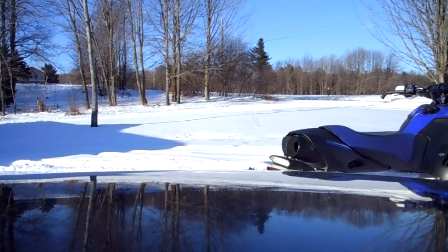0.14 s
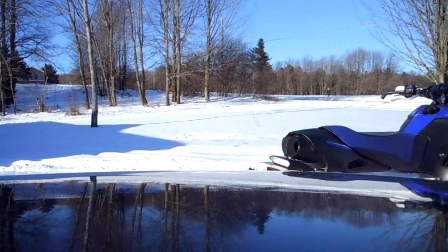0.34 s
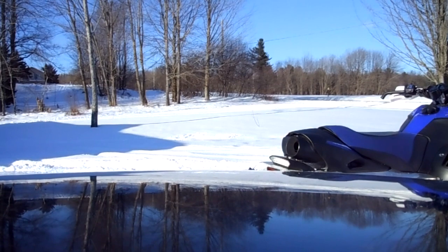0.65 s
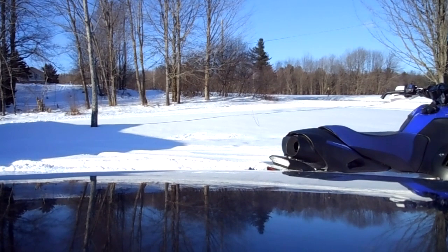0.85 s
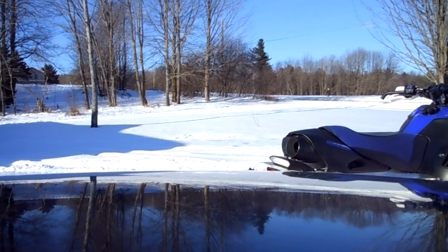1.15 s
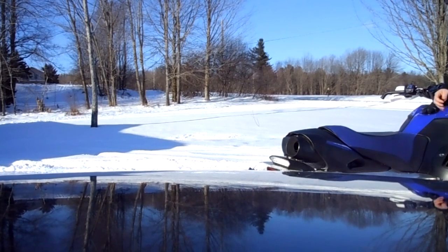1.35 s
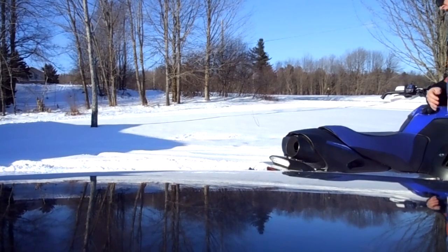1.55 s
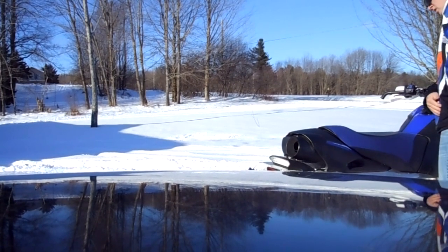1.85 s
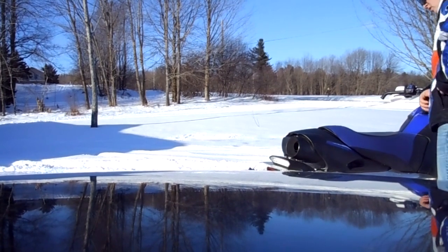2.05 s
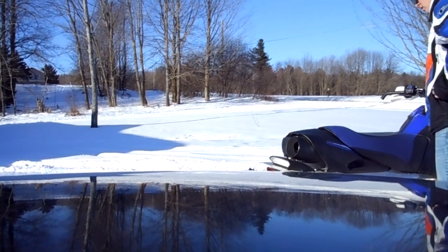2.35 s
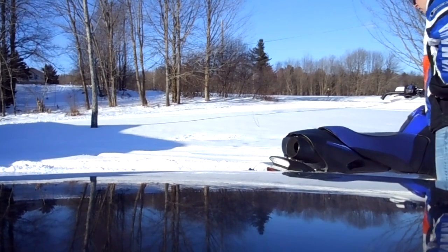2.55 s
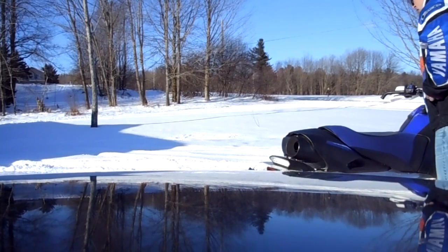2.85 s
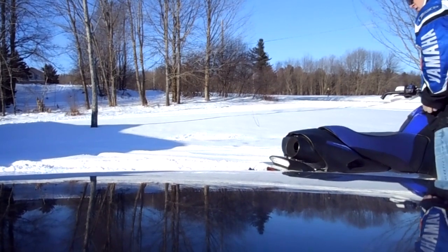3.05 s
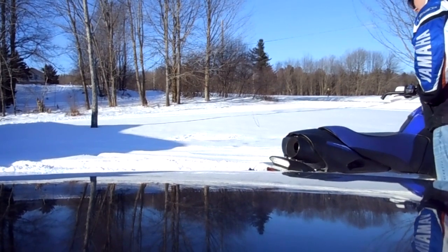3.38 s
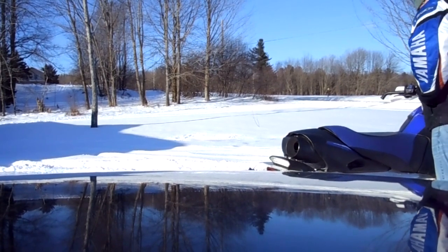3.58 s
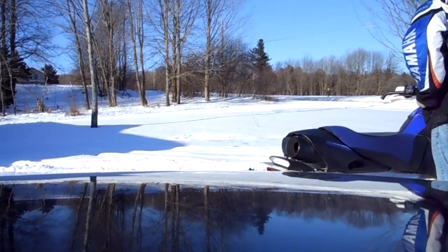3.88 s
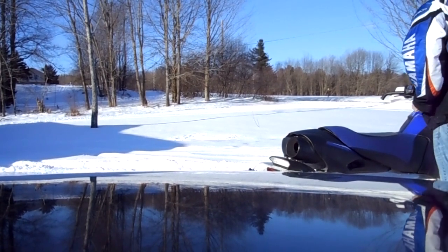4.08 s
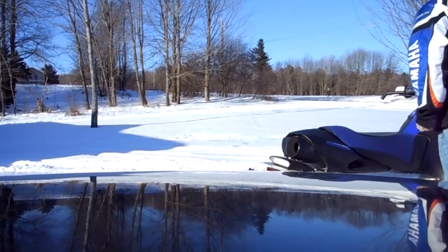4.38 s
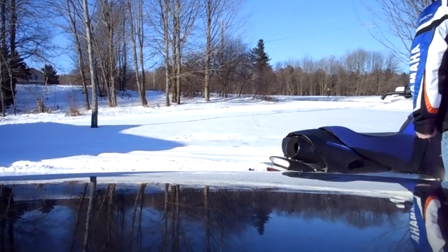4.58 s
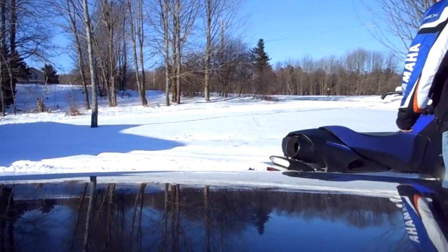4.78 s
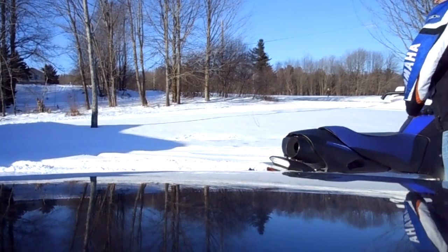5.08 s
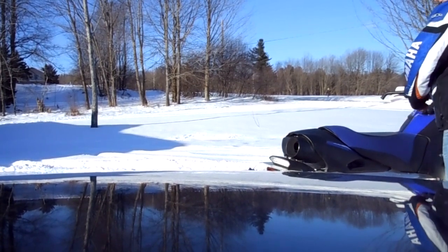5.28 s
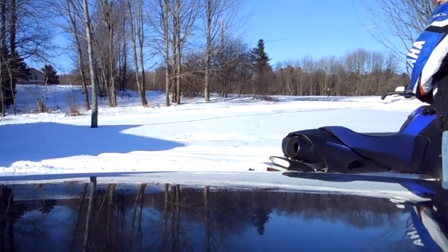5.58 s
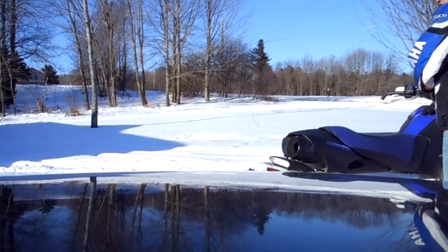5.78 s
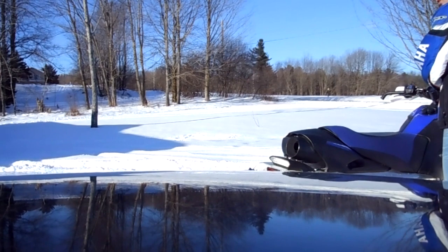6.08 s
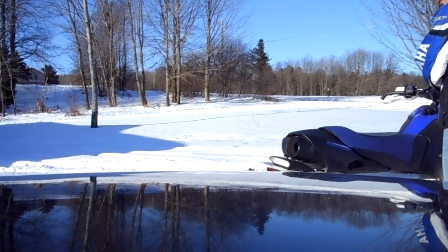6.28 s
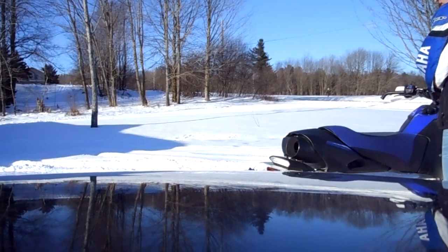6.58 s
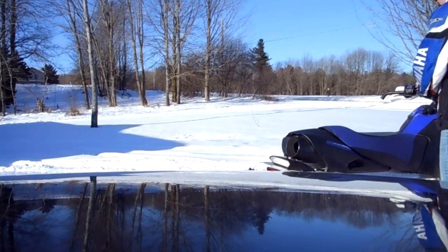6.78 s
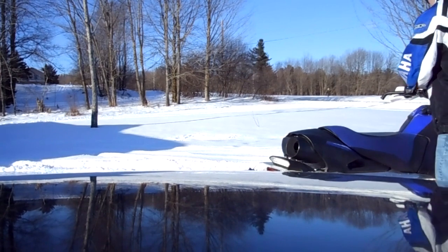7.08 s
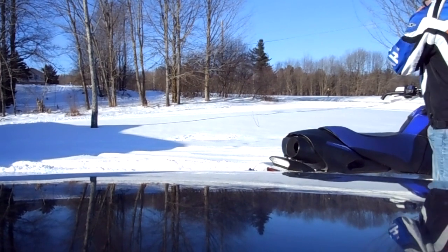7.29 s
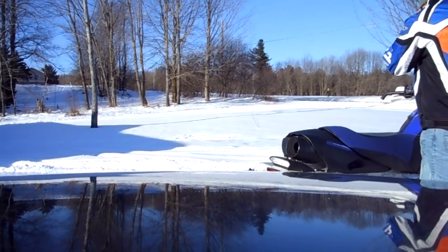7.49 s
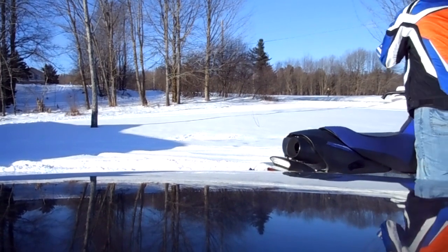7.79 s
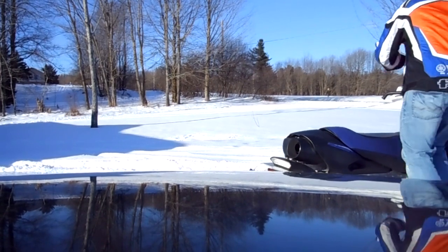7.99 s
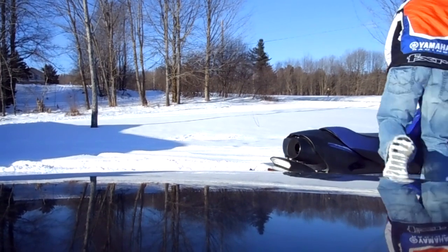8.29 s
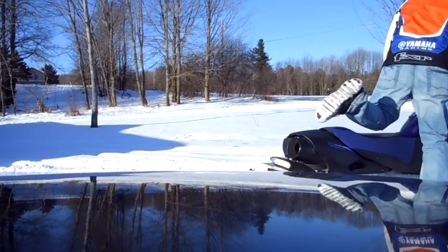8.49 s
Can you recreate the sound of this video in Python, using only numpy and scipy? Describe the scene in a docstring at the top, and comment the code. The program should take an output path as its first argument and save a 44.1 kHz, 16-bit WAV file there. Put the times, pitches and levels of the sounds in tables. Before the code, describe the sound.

Close outdoor idle of a snowmobile with a loud exhaust: fast low throbbing, uneven hunting, sharp hissy spits, mechanical ticking, and a brief rev near the end.

```python
"""A three-cylinder four-stroke snowmobile stands idling in an open snowy yard, a few metres from two close ports.
From the start each firing booms and barks in the silencer, spits a short jet of gas and rasps as the pipe swings back.
Valve gear ticks between the firings, over a whirr of chain and gears and the ring of the engine casing.
The idle hunts in speed and effort and these layers follow; loose parts of the hood buzz twice, once before
the middle and once well after it. Near the end a small blip of throttle: the intake growls, the bark hardens."""
import sys
import numpy as np
from scipy import signal
from scipy.fft import rfft, irfft, next_fast_len
from scipy.io import wavfile

SR = 44100
rng = np.random.default_rng(int(sys.argv[2]) if len(sys.argv) > 2 else 0)


def persist_wave(psi):
    """Save psi, clipped to +-1, as 16-bit WAV."""
    counts = np.round(np.clip(psi, -1, 1) * 32767).astype(np.int16)
    wavfile.write(sys.argv[1], SR, np.atleast_2d(counts).T)


N = 381024

# spare samples before and after the scene, so that noise and pulses have room at its ends
LEAD = 4410
TIME = np.arange(-LEAD, next_fast_len(N + 2 * LEAD) - LEAD) / SR
FREQS = np.arange(len(TIME) // 2 + 1) * SR / len(TIME)

# how hard the engine works; exhaust and machinery follow it: (time [s], effort about the usual idle [dB])
EFFORT = [(0.0, 1.5), (0.52, 1.5), (0.72, -0.9), (1.06, 3), (1.16, 0.5), (1.56, -1.9), (1.89, -0.8),
          (2.19, 2.5), (2.26, 0.44), (3.96, 1.53), (4.26, -2), (4.56, 1.14), (5.81, 1.5), (6.03, -1.1),
          (6.69, 2.3), (6.75, -0.2), (7.44, 1.6), (7.54, -1), (8.07, 1.9), (8.18, 4.5), (8.3, 0), (8.64, 4)]


def undb(db):
    """Decibels to gain."""
    return 10 ** (np.asarray(db) / 20)


def across(points, at=FREQS, axis=1):
    """Join the rows (frequency [Hz], value, ..) on a log-frequency axis."""
    columns = np.transpose(points)
    return np.interp(np.log(np.maximum(at, 1)), np.log(columns[0]), columns[axis])


def swell(times, middle_s, half_s):
    """A smooth rise and fall, 1 at its middle and 1/e at half_s to either side."""
    return np.exp(-((times - middle_s) / half_s) ** 2)


def hiss(gain):
    """Turbulence: white noise shaped by the given gain per frequency, rms 1."""
    noise = irfft(rfft(rng.standard_normal(len(TIME))) * gain, len(TIME))
    return noise / np.std(noise)


def puffs(times, db, width_s, spectrum, rate=40.1):
    """A pointed burst of turbulence at each time; db is its rms level over one period of the rate [Hz]."""
    place = np.clip((times - TIME[0]) * SR, 0, len(TIME) - 1).astype(int)
    offset_s = np.arange(-LEAD, LEAD + 1) / SR
    bell = np.exp(-.5 * np.abs(offset_s / width_s) ** 1.205)
    bell /= np.sqrt(np.sum(bell ** 2) * rate / SR)
    strikes = np.bincount(place, undb(db), len(TIME))
    return signal.fftconvolve(strikes, bell, "same") * hiss(undb(across(spectrum)))


def crank(start_phase=.915, jitter=0.0053):
    """Firing rate and phase [cycles], firing times and numbers; no two strokes take quite as long."""
    # engine speed, a hunting idle and then the blip: (time [s], firings per second [Hz])
    speed = [(0.0, 35.82), (0.415, 39.3), (0.625, 36.07), (0.815, 35.81), (1.055, 38.07), (1.28, 36.64),
             (1.515, 37.38), (1.875, 35.96), (1.945, 37.2), (2.63, 37.88), (3.06, 37.03), (3.235, 38.64),
             (3.65, 36.49), (3.89, 39.53), (4.04, 38.11), (4.54, 37.72), (4.625, 38.6), (4.93, 35.22),
             (5.125, 39.15), (5.54, 37.12), (6.09, 39.03), (6.375, 36.39), (6.58, 38.66), (6.765, 35.82),
             (7.195, 40.34), (7.375, 37.42), (7.6, 37.07), (8.08, 38.8), (8.175, 44.51), (8.64, 41.09)]
    hz = np.interp(TIME, *np.transpose(speed))
    phase = np.cumsum(hz) / SR
    phase += start_phase - phase[LEAD]
    number = np.arange(np.ceil(phase[0]), phase[-1]).astype(int)
    phase += jitter * np.interp(phase, number, rng.standard_normal(len(number)))
    times = np.interp(number, phase, TIME)
    return hz, phase, times, number


def boom(phase, hz, lag=.086, smear=1.45):
    """One swing of suction and pressure per firing, six orders shaped by the silencer; rms 1."""
    # spectrum of the silencer's boom: (frequency [Hz], relative level [dB])
    silencer = [(33, -16), (38, -9.5), (45, -12), (74, 1), (88, -0.5), (114, 2), (132, -4), (146, -10),
                (160, -22), (186, -12), (210, -24.5), (240, -23.5)]
    orders = np.arange(1, 7)[:, None]
    gains = undb(across(silencer, orders * hz))
    # the silencer rings on the second and third order and turns the others out of step (radians)
    turn = smear * (orders - 2) * (orders - 3)
    swings = gains * np.sin(2 * np.pi * orders * (phase - lag) + turn)
    return np.sum(swings, axis=0) / np.sqrt(np.sum(gains ** 2, axis=0) / 2)


def bark(phase, hz, racing, lag=0.145, wander=0.007, smear=0.07, top_hz=510, flatten=0.1):
    """The steep edge of the blowdown pulse, a little early or late at each firing; sharper when racing.

    The pulse lasts a fixed crank angle, so the bark rises with speed; its orders sum to rms 1 at idle before the pipe.
    """
    # strength of each order at idle: (multiple of the firing rate, relative level [dB])
    blowdown = [(6, -14), (7, -5), (8, 0), (9, -5), (10, -11), (11, -12), (12, -13), (13, -19), (14, -27),
                (15, -24), (16, -28)]
    orders, db = np.transpose(blowdown)
    gains = undb(db) / np.sqrt(np.sum(undb(db) ** 2) / 2)
    # the spectrum flattens by this share per extra firing per second
    gains = gains[:, None] * undb(-flatten * db[:, None] * racing)
    number = np.arange(np.floor(phase[0]), phase[-1])
    angle = phase - lag + wander * np.interp(phase, number, rng.standard_normal(len(number)))
    # the pipe draws the pulse out a little and passes nothing far above its top frequency
    turns = smear * (orders - orders[np.argmax(db)]) ** 2
    edge = np.zeros(len(TIME))
    for order, gain, turn in zip(orders, gains, turns):
        passed = gain / (1 + (order * hz / top_hz) ** 20)
        edge -= passed * np.cos(2 * np.pi * np.round(order) * angle - turn)
    return edge


def exhaust(hz, phase, times, number, burn_db=0.88, spit_scatter_db=2.5, colour_db=2.16, flow_db=-24, surge_db=3):
    """Every firing burns a little differently; its pressure drives the silencer and the gas noise at the outlet."""
    # the three cylinders in firing order: (pressure [dB], ordinary spit [dB])
    cylinders = [(-0.12, 1.5), (1.45, 2.5), (0.17, 1)]
    # firings that spit hard: (time [s], nominal peak level [dB])
    hard_spits = [(0.2189, -12.5), (0.5851, -12), (0.6394, -15.5), (1.077, -7.5), (1.4002, -9),
                  (1.6432, -13.5), (1.6965, -11.5), (2.2922, -11.5), (3.0101, -14), (3.6486, -12),
                  (3.6755, -14), (3.7294, -11.5), (4.0657, -12.5), (4.119, -12), (5.0809, -13),
                  (5.3921, -11.5), (5.6331, -13.5), (5.8182, -11), (5.8706, -10), (6.1814, -13.5),
                  (6.6613, -10.5), (6.7974, -14), (6.9067, -10.5), (7.423, -12.5), (7.45, -9.5),
                  (7.5313, -12), (7.6924, -12)]
    # short spells in which ordinary firings spit less: (middle [s], half-length [s], level change [dB])
    lulls = [(1.51, 0.056, -5), (4.354, 0.066, -5), (8.425, 0.11, -8)]
    # spectrum of the swirling flow in the silencer: (frequency [Hz], relative level [dB])
    flow_spectrum = [(15, -27), (30, -32), (52, 14), (90, -25), (150, 4), (230, -8), (330, -3.5),
                     (480, -19), (900, -34.5)]
    # spectrum of the gas jet: (frequency [Hz], relative level [dB])
    spit_spectrum = [(300, -1), (800, -10.5), (2000, -21.5), (4500, -26), (6000, -24), (7500, -10),
                     (9700, -1), (11000, 1.5), (12500, 2), (14000, -8.5), (16000, -13.5)]
    # spectrum of the whistle at the outlet lip: (frequency [Hz], relative level [dB])
    whistle_spectrum = [(9000, -24), (11200, -12), (12300, 1.5), (12950, 7), (13700, 2), (14100, -20),
                        (15000, -16)]
    # spectrum of the rasp of the pipe: (frequency [Hz], relative level [dB])
    rasp_spectrum = [(200, 4), (800, 3), (1500, 1.5), (2800, 3.5), (4100, -3), (5200, -1), (7000, -1.5),
                     (10000, -0.5), (13500, 5), (16000, -4)]

    # base level at the usual idle (dB) plus the share of the effort that each layer follows (dB per dB)
    effort = np.interp(times, *np.transpose(EFFORT))
    boom_db = -15.5 + 0.67 * effort
    bark_db = -31.5 + 0.53 * effort
    rasp_db = -47.5 + 0.95 * effort
    spit_db = -40 + 0.47 * effort
    for middle_s, half_s, dip_db in lulls:
        spit_db = spit_db + dip_db * swell(times, middle_s, half_s)

    pressure_db, jet_db = np.array(cylinders)[(number - 1) % len(cylinders)].T
    burn, jet, colour = rng.standard_normal((len(times), 3)).T
    pressure_db = pressure_db + burn_db * burn
    jet_db = jet_db + spit_scatter_db * jet
    # the firing nearest each listed time spits hard; its spit sets its pressure too
    hard_s, peak_db = np.transpose(hard_spits)
    hard = np.abs(times[:, None] - hard_s).argmin(axis=0)
    crest_db = 20  # peak above the mean level over the firing
    jet_db[hard] = peak_db - crest_db - spit_db[hard]
    pressure_db[hard] = .22 * jet_db[hard]  # dB per dB above the usual spit
    jet_db = jet_db + spit_db

    # the gas swirls most just after each firing
    surge = flow_db + surge_db * np.cos(2 * np.pi * (phase - .1))
    swirl = undb(surge) * hiss(undb(across(flow_spectrum)))
    low = (boom(phase, hz) + swirl) * undb(np.interp(TIME, times, boom_db + pressure_db))

    # above the idle range the bark hardens with speed
    idle_top_hz, bark_db_per_hz = 40.4, 0.48
    racing = np.maximum(hz - idle_top_hz, 0)
    bark_gain = undb(np.interp(TIME, times, bark_db) + bark_db_per_hz * racing)
    edge = bark(phase, hz, racing) * bark_gain

    # the brief jet hisses and whistles in a balance that varies at random from firing to firing, and trails off;
    # the pipe swings back some milliseconds later
    jet_s = .0005  # width of the burst
    spit = puffs(times, jet_db - colour_db * colour - 2.5, jet_s, spit_spectrum)
    whistle = puffs(times, jet_db + colour_db * colour - 2.0, jet_s, whistle_spectrum)
    trail = puffs(times + 0.0025, jet_db - 15.5, jet_s, spit_spectrum)
    rasp = puffs(times + 0.0078, rasp_db + 1.55 * pressure_db, 0.0018, rasp_spectrum)
    return low + edge + spit + whistle + trail + rasp


def machinery(times, tick_db=-53, tick_scatter_db=2.5, whirr_db=-45, casing_db=-54, spread_db=-15, follows=0.62):
    """Valves tick once per firing, chain and gears whirr, the casing rings and the hood buzzes; mid and side sound."""
    # spectrum of the valve ticks: (frequency [Hz], relative level [dB])
    valve_spectrum = [(400, 2), (800, 7), (990, -42), (1120, 12.5), (1350, -3), (1750, 4), (2000, 0),
                      (2250, 1), (2800, -5), (3400, -4), (4300, -14), (13000, -41)]
    # spectrum of the whirr of chain and gears: (frequency [Hz], relative level [dB])
    whirr_spectrum = [(60, 6.5), (150, 13.5), (400, 12.5), (560, 12), (820, 4), (990, -1.5), (1330, -0.5),
                      (2400, -8), (3900, -27), (6500, -46), (13000, -11), (16000, -49)]
    # resonances of the engine casing: (frequency [Hz], width [Hz], relative level [dB])
    resonances = [(575, 55, -4.5), (830, 91, -5.5), (1105, 17, -0.5), (1280, 35, -14), (1463, 19, -7),
                  (2200, 110, -14.5), (4530, 83, -22), (5160, 210, -21)]
    # buzzes of loose parts of the hood: (time [s], level [dB])
    buzzes = [(3.335, -47), (6.916, -44)]
    # spectrum of the hood: (frequency [Hz], relative level [dB])
    hood_spectrum = [(1200, -29), (2300, -10), (2900, 8), (3600, -12), (5500, -5), (9000, -23)]

    effort = undb(follows * np.interp(TIME, *np.transpose(EFFORT)))
    each_tick_db = tick_db + tick_scatter_db * rng.standard_normal(len(times))
    ticks = puffs(times - .007, each_tick_db, 0.0022, valve_spectrum)
    # the whirr leaves the whole hood, so a little of it differs between the ports
    whirr = undb(whirr_db) * hiss(undb(across(whirr_spectrum)))
    wide = undb(whirr_db) * hiss(undb(across(whirr_spectrum)))
    power = np.zeros(len(FREQS))
    for centre_hz, width_hz, db in resonances:
        power += undb(2 * db) / (1 + ((FREQS - centre_hz) / width_hz) ** 2) ** 2
    casing = undb(casing_db) * hiss(np.sqrt(power))
    rattles = puffs(*np.transpose(buzzes), 0.001, hood_spectrum)
    mid = effort * (ticks + whirr + casing) + rattles
    side = effort * undb(spread_db) * wide
    return mid, side


def intake(times, gulp_s=0.0019, growl_db=-42, blip_s=8.175, blip_half_s=0.057):
    """With the throttle open, each cylinder gulps air through the airbox."""
    # spectrum of the intake growl: (frequency [Hz], relative level [dB])
    growl_spectrum = [(300, -12), (550, 3), (680, -3), (820, 7), (1000, -16), (1300, -8), (1500, -7),
                      (1680, -2.5), (2000, -14), (4000, -28), (8000, -45)]
    gulps = puffs(times + 0.0036, np.full(len(times), growl_db), gulp_s, growl_spectrum)
    return swell(TIME, blip_s, blip_half_s) * gulps


def scene():
    """The sled reaches two closely spaced microphone ports; the snow returns no echo."""
    # the ports: (frequency [Hz], left minus right [dB], phase by which left leads [rad])
    ports = [(60, 1.5, 0), (280, 2.3, 0), (600, .9, .14), (2000, .1, .1), (4500, .1, -.16),
             (8000, 1.7, -.27), (10500, 1.8, -.52), (13000, 1.6, -.6)]
    hz, phase, times, number = crank()
    mid, side = machinery(times)
    sled = rfft(exhaust(hz, phase, times, number) + intake(times) + mid)
    # each port takes half the difference, in opposite senses
    left = undb(across(ports) / 2) * np.exp(.5j * across(ports, axis=2))
    heard = irfft(np.array([sled * left, sled / left]), len(TIME)) + np.array([side, -side])
    return heard[:, LEAD:LEAD + N]


def record(dry):
    """Behind the microphone ports a steep elliptic low-pass cuts the top of the treble."""
    top_hz = 14250
    low_pass = signal.ellip(12, .2, 60, top_hz, fs=SR, output="sos")
    return signal.sosfilt(low_pass, dry)


dry = scene()
out = record(dry)
persist_wave(out)
```